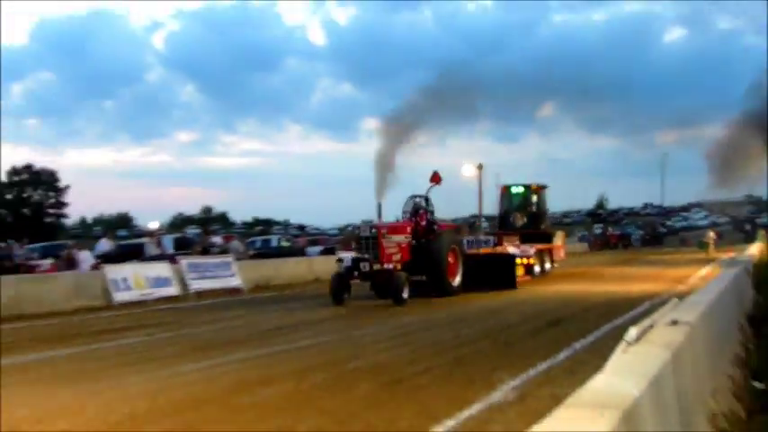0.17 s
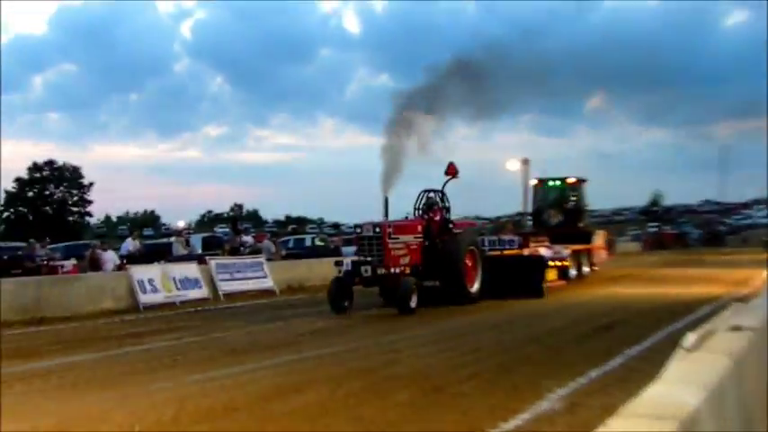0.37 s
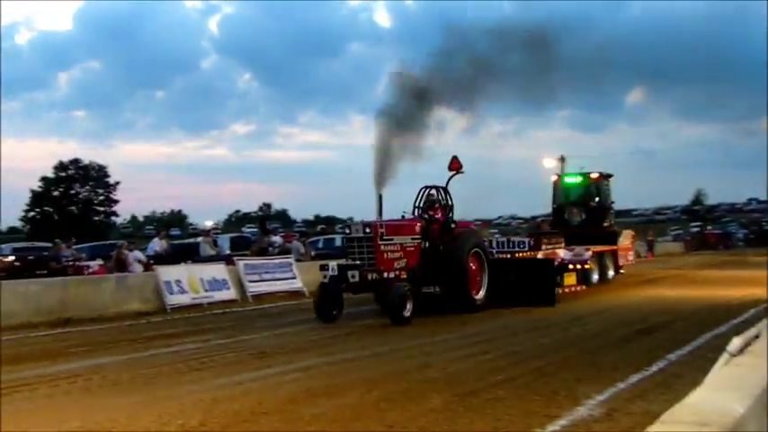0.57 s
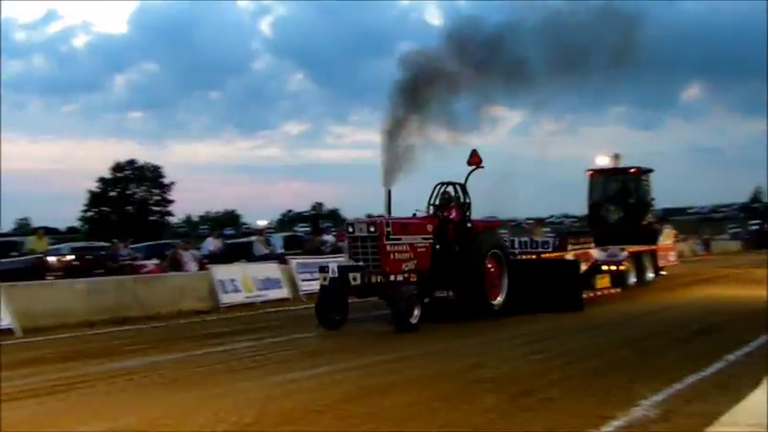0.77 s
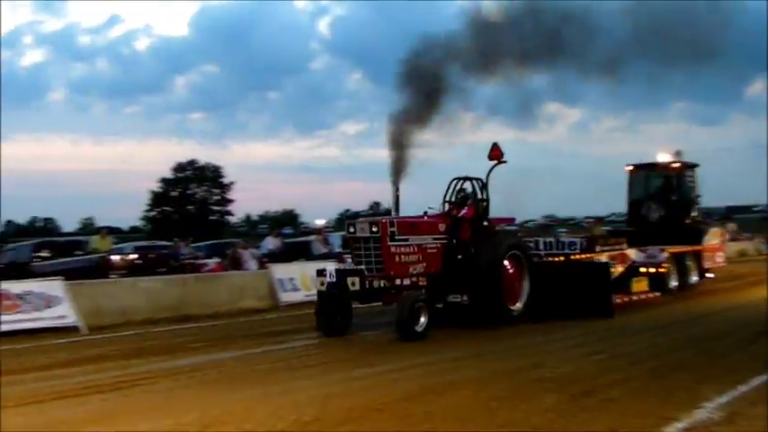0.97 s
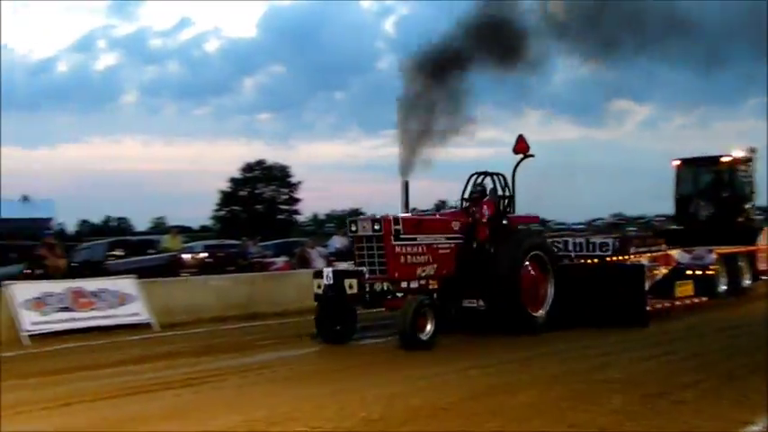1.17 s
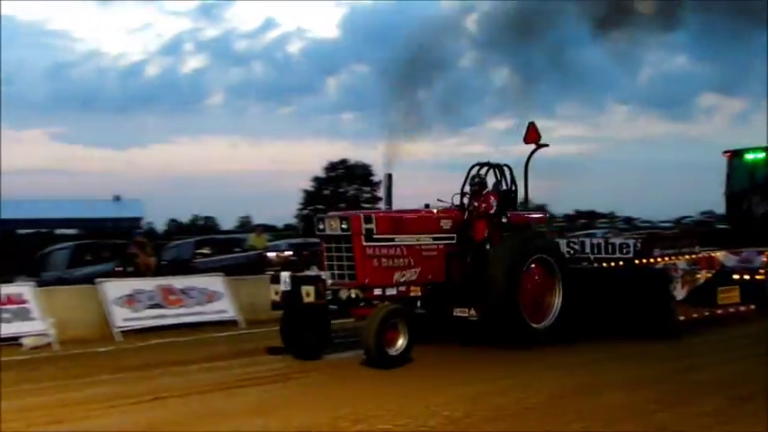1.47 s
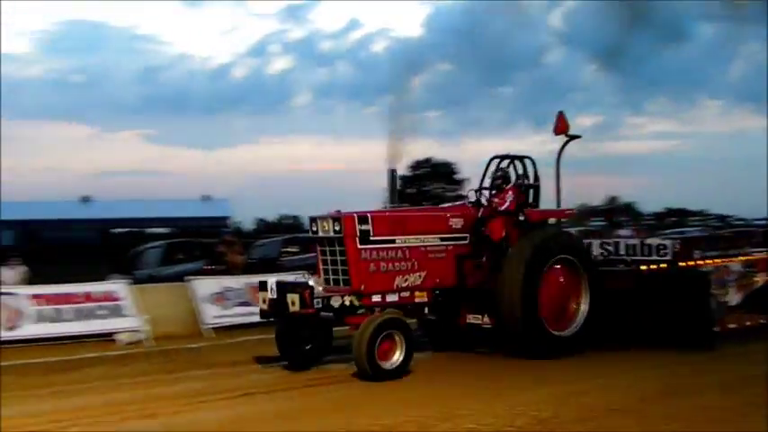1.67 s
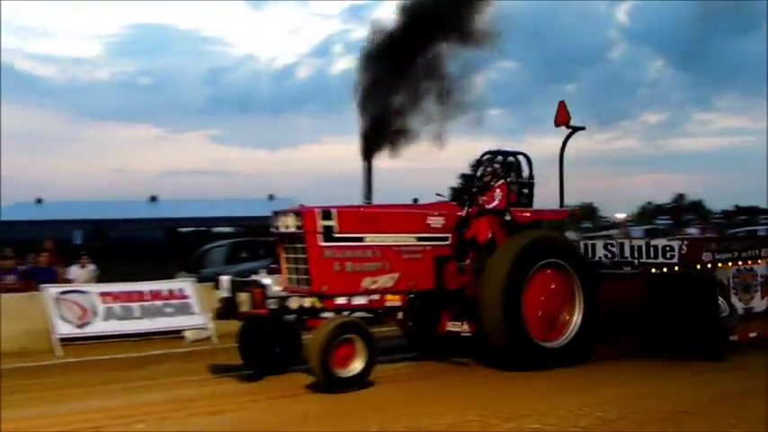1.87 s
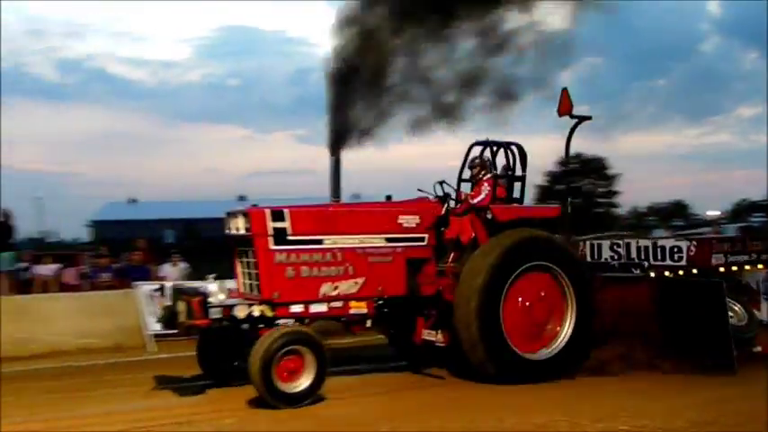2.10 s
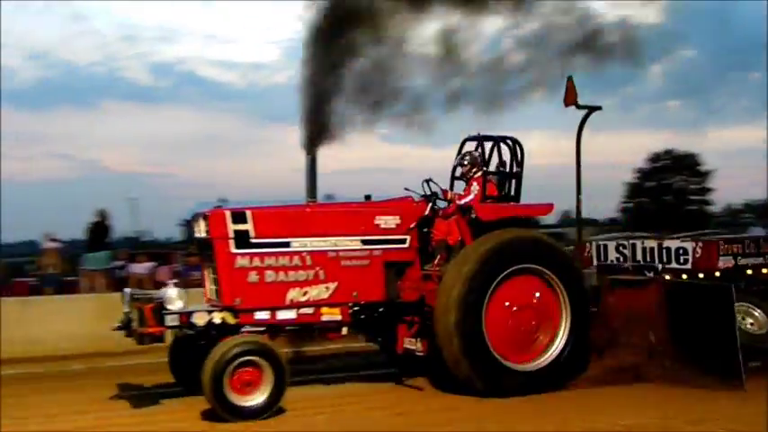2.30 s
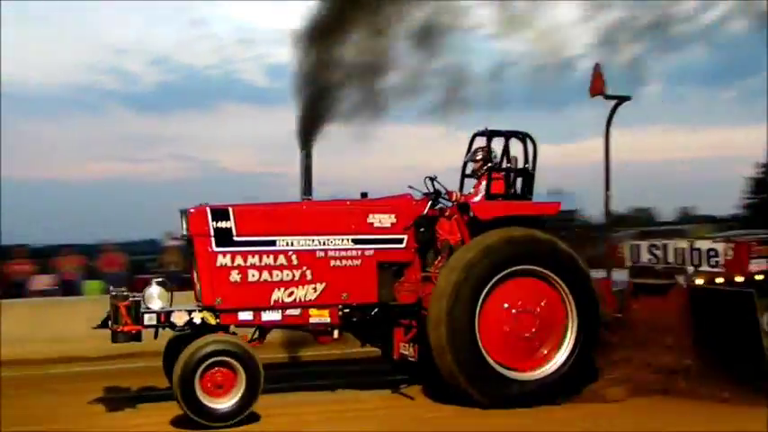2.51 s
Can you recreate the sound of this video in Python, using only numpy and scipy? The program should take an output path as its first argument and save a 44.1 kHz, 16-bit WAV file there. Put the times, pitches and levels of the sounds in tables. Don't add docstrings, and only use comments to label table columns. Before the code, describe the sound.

Turbocharged diesel tractor roaring flat out on dirt, loud steady hiss, howling exhaust and high whistle

```python
import sys
import numpy as np
from scipy import signal
from scipy.fft import rfft, irfft, next_fast_len
from scipy.io import wavfile
from scipy.ndimage import uniform_filter1d, map_coordinates

SR = 44100
rng = np.random.default_rng(int(sys.argv[2]) if len(sys.argv) > 2 else 0)


def voltage_ratio(decibels):
    exponent = np.asarray(decibels, float) / 20
    return 10 ** exponent


def wrap_up_sound(samples):
    columns = np.atleast_2d(samples).T
    tamed = np.clip(columns, -1, 1)
    steps = np.round(tamed * 32767).astype(np.int16)
    wavfile.write(sys.argv[1], SR, steps)


N = 116865
TIME_S = np.arange(N) / SR

# time in seconds, distance to the microphone in m.
DISTANCE = [(0, 18.3), (.8, 14.46), (1.6, 10.9), (2.65, 8.13)]
# time in seconds, firing rate in Hz, level of the firing tone in dB.
ENGINE = [(0.0, 136.4, -43), (0.05, 138.1, -45), (0.56, 137.0, -43.5), (0.96, 135.9, -45),
          (1.33, 133.2, -47), (1.39, 133.6, -62), (1.54, 130.1, -48), (1.69, 129.0, -50),
          (1.77, 119.7, -58), (1.81, 117.5, -49), (1.87, 118.6, -42), (1.96, 119.1, -52),
          (2.08, 123.8, -40), (2.24, 118.8, -52), (2.31, 117.4, -43.5), (2.6, 115.5, -47.5)]
# multiple of the firing rate, level under the tone in dB.
FIRING_OVERTONES = [(2, -15), (3, -14)]
# time in seconds, blade tone in Hz, level in dB.
TURBO = [(0, 14430, -37), (.13, 14520, -28), (.27, 14590, -33), (.55, 15200, -34), (.81, 15515, -35),
         (1.04, 15625, -37), (1.32, 15445, -32), (1.45, 15450, -35), (1.57, 15135, -37),
         (1.715, 15170, -36), (1.75, 14790, -30), (1.79, 13920, -23), (1.87, 13070, -31),
         (2.12, 13540, -25), (2.33, 13630, -25), (2.44, 13800, -29), (2.57, 14000, -25), (2.65, 14110, -32)]
# time in seconds, upper pipe mode in dB, lower pipe mode in Hz,
# its level in dB, shell ring in Hz, its level in dB, cap ring in dB.
STACK = [(0, -25, 500, -40, 900, -28, -36), (.22, -29, 499.3, -46, 950, -27, -40),
         (.4, -28, 506.5, -32.5, 990, -26.5, -43), (.7, -25.5, 490, -35.5, 947, -29, -40),
         (1.1, -25, 456, -32.5, 1150, -31.5, -40), (1.5, -26.5, 450, -33.5, 1128, -34.5, -37.5),
         (1.6, -28.5, 450, -37.5, 1089, -30.5, -48), (1.72, -30, 445, -30.5, 1082, -42, -47),
         (1.77, -60, 430, -42, 1050, -54, -38), (1.88, -52, 425, -28.5, 1015, -34, -41),
         (1.97, -39, 430, -32.5, 992, -37, -44), (2.1, -41, 440, -27.5, 980, -45, -30.5),
         (2.22, -37, 436.3, -28.5, 980, -55, -50), (2.42, -40, 420.3, -31.5, 978, -48, -54),
         (2.65, -34.5, 412.8, -29.5, 978, -50, -54)]
# time in seconds, flow level in dB.
FLOW = [(0.0, -15.5), (0.03, -16), (0.75, -15.5), (1.0, -16), (1.68, -16), (1.71, -18.5), (1.91, -15),
        (1.93, -16.5), (2.62, -16), (2.65, -16.5)]
# time in seconds, level over the flow in dB.
POPS = [
    (1.627, 4),
    (1.72, 5),
    (1.897, 4.5),
    (1.914, 3.5),
    (2.03, 3),
]
# frequency in Hz, density in dB per Hz.
HISS = [(1300, -25), (2200, -16), (3700, -10), (4800, -4), (6300, -1.5), (7200, -6), (8800, -8),
        (9600, -14.5), (11000, -48)]
# frequency in Hz, density in dB per Hz.
ROAR = [(30, -37), (150, -34), (300, -22.5), (420, -4.5), (900, -4.5), (1600, -5), (2400, -13.5),
        (4000, -21.5)]
# frequency in Hz, density in dB per Hz.
INTAKE = [(8500, -36), (10400, 6), (11300, -2.5), (12500, -29), (14000, -19), (15600, -10)]


def unit(x):
    return x / np.sqrt(np.mean(abs(x) ** 2) + 1e-20)


def curves(rows):
    s, *columns = np.transpose(rows)
    return [np.interp(TIME_S, s, column) for column in columns]


def wobble(rate):
    return map_coordinates(rng.standard_normal(2000), [np.arange(N) * rate / SR])


def bump(at_s, lasts_s):
    return np.exp(-((TIME_S - at_s) / lasts_s) ** 2)


def filtered(x, response):
    m = next_fast_len(N + SR // 2)
    return irfft(rfft(x, m) * response(np.fft.rfftfreq(m, 1 / SR)), m)[..., :N]


def rush(spectrum, patchy_db):
    z = signal.stft(rng.standard_normal(N), nperseg=512)[2]
    patches = uniform_filter1d(rng.standard_normal(z.shape), 6, 0)
    patches = uniform_filter1d(patches, 10, 1)
    x = signal.istft(z * voltage_ratio(patchy_db * unit(patches)), nperseg=512)[1][:N]
    f, db = np.transpose(spectrum)
    return unit(filtered(x, lambda hz: voltage_ratio(np.interp(np.log(hz + 1), np.log(f), db))))


def mode(hz, wide_hz, steady=0, order=1):
    a, b = filtered(rng.standard_normal((2, N)), lambda f: 1 / (1 + (f / wide_hz) ** 2) ** order)
    swing = np.sqrt(1 - np.clip(steady, 0, 1) ** 2) * unit(a + 1j * b) + steady
    phase = 2 * np.pi * np.cumsum(hz + np.zeros(N)) / SR
    return np.sqrt(2) * (swing * np.exp(1j * phase)).real


def ground(x):
    stack_m, mic_m, sound_m_s = 2.6, 1.2, 343
    reflected, edge_hz = 0.22, 6400
    lag = 2 * stack_m * mic_m / curves(DISTANCE)[0] / sound_m_s * SR
    echo = filtered(x, lambda f: 1 / (1 + (f / edge_hz) ** 4))
    late = map_coordinates(echo, [np.arange(N) - lag], mode="reflect")
    return (x + reflected * late) / np.sqrt(1 + reflected ** 2)


def firing():
    return np.cumsum(curves(ENGINE)[0] * (1 + 0.012 * wobble(24.8))) / SR


def sled():
    near = DISTANCE[-1][1] / curves(DISTANCE)[0]
    rumble = rush([(20, -2), (70, 0), (200, -2), (400, -40)], patchy_db=1)
    under_flow_db = -39
    return voltage_ratio(curves(FLOW)[0].mean() + under_flow_db) * near * voltage_ratio(1.5 * wobble(9)) * rumble


def intake(turns_puff):
    air = unit((0.65 + 0.3 * turns_puff) * rush(INTAKE, patchy_db=1.0))
    nearness = (12 / curves(DISTANCE)[0]) ** 0.92
    return voltage_ratio(curves(FLOW)[0] - 20) * nearness * air


def turbo():
    hz, db = curves(TURBO)
    tone = voltage_ratio(2 * wobble(25)) * mode(hz + 18 * wobble(35), 26, steady=0.4)
    skirt = voltage_ratio(-3) * mode(hz - 60, 480, order=2)
    haze = voltage_ratio(-14) * mode(hz - 100, 900, order=2)
    return voltage_ratio(db + 0.3) * (tone + skirt + haze)


def thump(turns):
    tone = np.sin(2 * np.pi * turns)
    for k, db in FIRING_OVERTONES:
        tone = tone + voltage_ratio(db + 3 * wobble(16)) * np.sin(2 * np.pi * k * turns)
    return np.sqrt(2) * voltage_ratio(curves(ENGINE)[1] + 0.72 * wobble(13.84)) * tone


def stack():
    upper_db, lower_hz, lower_db, shell_hz, shell_db, cap_db = curves(STACK)
    upper = voltage_ratio(upper_db) * mode(730.6 + 11 * wobble(14), 47, steady=0.4)
    lower = voltage_ratio(lower_db) * mode(lower_hz + 10 * wobble(14), 37.97, steady=0.45)
    shell = voltage_ratio(shell_db) * ground(mode(shell_hz, 250, order=2))
    cap = voltage_ratio(cap_db) * mode(1953, 30.2)
    side = voltage_ratio(-27) * bump(0.19, 0.12) * mode(900, 30, steady=0.36)
    return upper + lower + shell + cap + side


def puffs(turns):
    sharpness, scatter_db = 1.6, 2
    size = map_coordinates(rng.standard_normal(int(turns[-1]) + 4), [turns], order=1)
    return unit(voltage_ratio(scatter_db * size) * (1 - np.cos(2 * np.pi * turns)) ** sharpness)


def exhaust(puff):
    puff_share = 0.2
    hiss = rush([(500, -70)] + HISS + [(13000, -60)], patchy_db=0.85)
    hiss = unit((1 - puff_share + puff_share * puff) * voltage_ratio(1.17 * wobble(400)) * hiss)
    roar = unit((0.85 + 0.25 * puff) * voltage_ratio(1.9 * wobble(200)) * rush(ROAR, patchy_db=1.28))
    pop_db = sum(db * bump(s, 0.002) for s, db in POPS)
    return voltage_ratio(curves(FLOW)[0]) * ground(voltage_ratio(pop_db) * hiss + voltage_ratio(-9) * roar)


def scene():
    turns = firing()
    puff = puffs(turns)
    return (sled() + intake(puff) + turbo() + thump(turns) + stack() + exhaust(puff))[None]


def roll_off(x):
    return signal.sosfilt(signal.butter(12, 15720, fs=SR, output="sos"), x)


def record(dry):
    notch_hz, wide_hz, left = 7883, 900, 0.067

    def port(f):
        stiff = notch_hz ** 2 - f * f
        return (stiff + 1j * f * left * wide_hz) / (stiff + 1j * f * wide_hz)

    x = filtered(dry, port)
    mix = x / (1 + abs(x / 0.95) ** 5) ** (1 / 5)
    return roll_off(mix)


dry = scene()
out = record(dry)
wrap_up_sound(out)
```